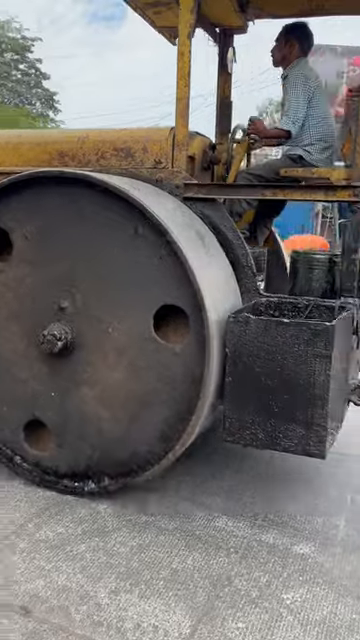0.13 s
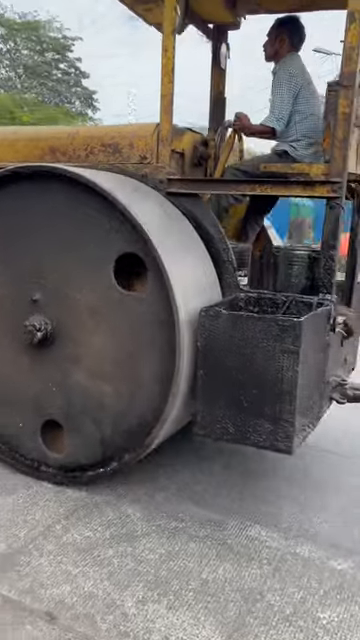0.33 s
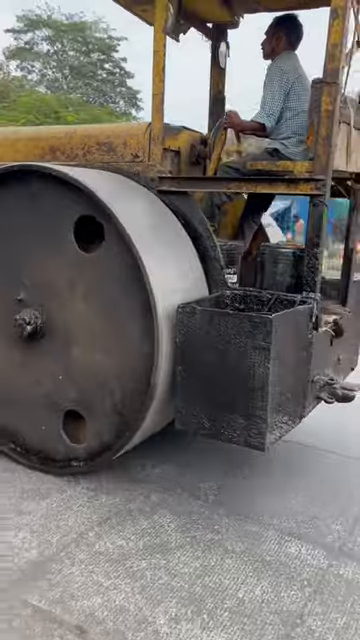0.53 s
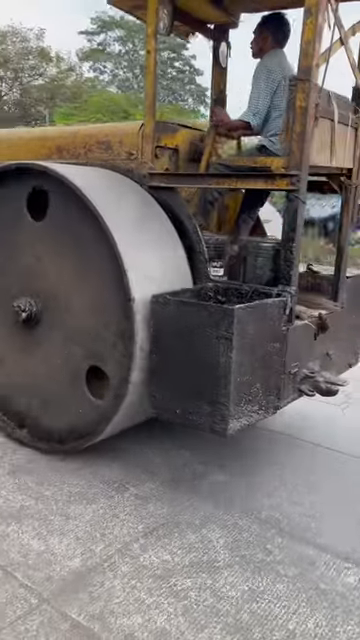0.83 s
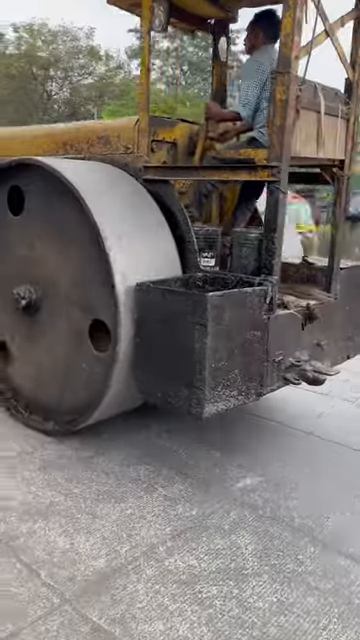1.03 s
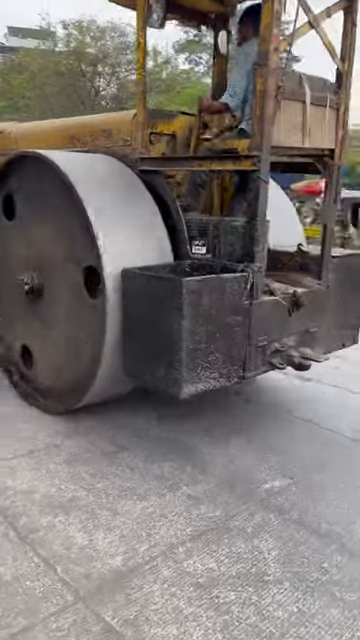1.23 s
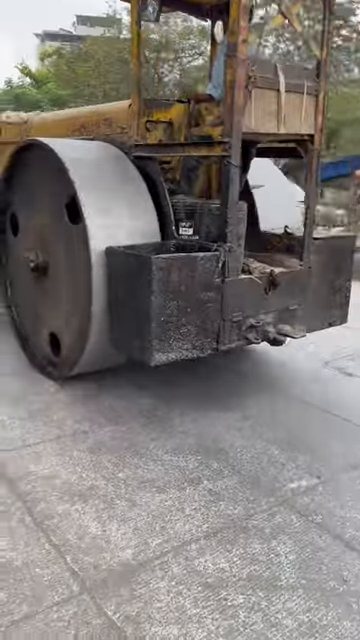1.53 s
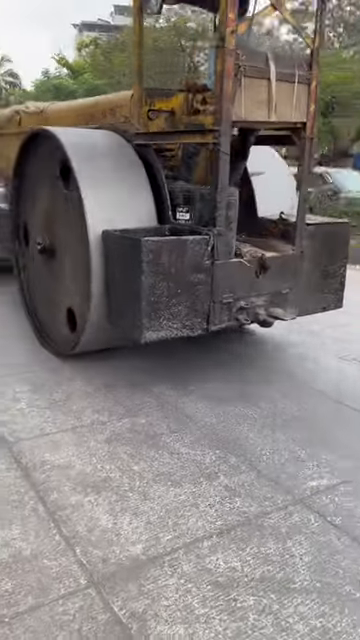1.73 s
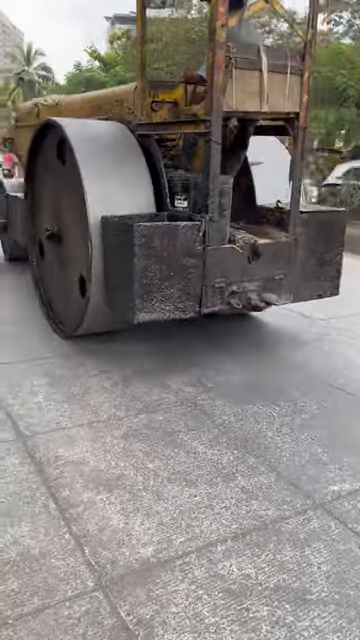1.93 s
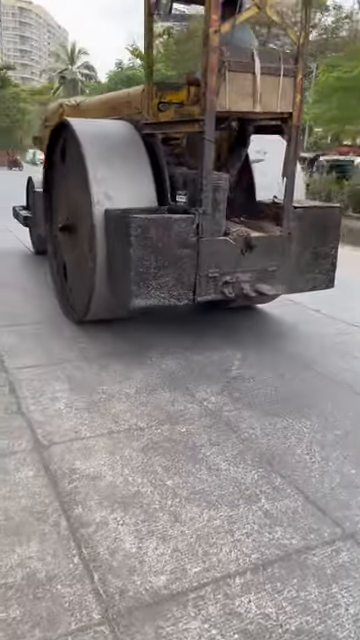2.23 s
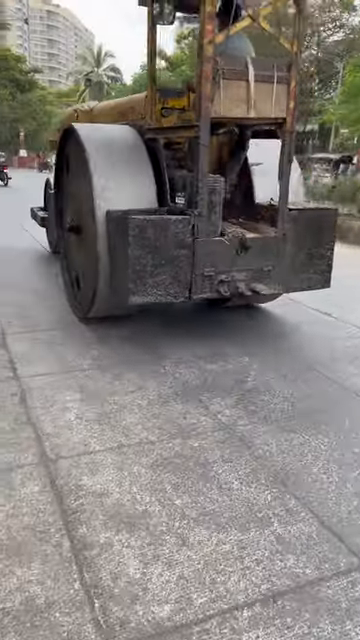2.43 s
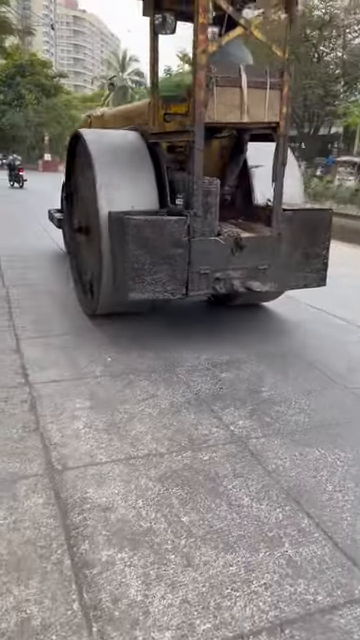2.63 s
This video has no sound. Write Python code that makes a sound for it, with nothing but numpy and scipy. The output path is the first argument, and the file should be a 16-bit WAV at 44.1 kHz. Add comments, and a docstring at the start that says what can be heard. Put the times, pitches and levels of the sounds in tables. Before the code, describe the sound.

A road roller rumbles close by from the start, low drum booms and uneven jolts over rough diesel and traffic roar, rattling panels and crackling grit. Faint dry squeaks at 0.1 and 0.6 s, scrapes at 0.3 and 0.8, then the loudest clank at 0.87 with a short ring. It gradually recedes, with crunches near 1.4 and a small tick at 2.3. A thin, high distant horn wavers from 2.25 to the end.

```python
"""An old road roller rolls away on a paved street: bumps and jolts ring the modes of its steel drums and frame.
Clicks and noise make crushed grit; chopped noise is the diesel among the traffic.
Struck resonators rattle, wavering tones squeak, banded grains scrape, dying tones ping; one clank is the loudest.
A far horn, two high partials, sounds near the end. A phone with two microphone ports hears it all.
"""
import sys
import numpy as np
from scipy import signal
from scipy.fft import rfft, irfft
from scipy.io import wavfile

SR = 44100
rng = np.random.default_rng(int(sys.argv[2]) if len(sys.argv) > 2 else 0)


def output_pcm(signal):
    """Save a mono or channel-first signal as 16-bit PCM at the path in sys.argv[1].

    Samples are clipped to [-1, 1] before scaling.
    """
    pcm = np.clip(np.atleast_2d(signal).T, -1, 1) * 32767
    wavfile.write(sys.argv[1], SR, np.round(pcm).astype(np.int16))


N = 123480


def amp(db):
    """Decibels to linear amplitude."""
    return 10 ** (np.asarray(db) / 20)


def evened(x):
    """Scales to rms 1."""
    return x / np.sqrt(np.mean(x ** 2) + 1e-20)


def along(table, column):
    """Interpolates one column of a time table at every sample."""
    rows = np.array(table)
    return np.interp(np.arange(N) / SR, rows[:, 0], rows[:, column])


def colour(x, points):
    """Filters by a (Hz, dB) spectrum, linear in log frequency, -70 dB outside; rms 1."""
    point_hz, point_db = np.transpose(points)
    hz = np.fft.rfftfreq(N, 1 / SR) + 1
    gain_db = np.interp(np.log(hz), np.log(point_hz), point_db, left=-70, right=-70)
    return evened(irfft(rfft(x) * amp(gain_db), N))


def grains(per_s, spread_db):
    """Clicks of random sign at a mean rate; positive spread makes a few larger, negative a few smaller."""
    size_db = spread_db * np.minimum(rng.exponential(1, N), 5)
    sign = rng.choice([-1., 1.], N)
    return amp(size_db) * sign * (rng.random(N) < per_s / SR)


def wander(seconds):
    """Slow random drift, rms 1: noise smoothed by a Hann window of this length."""
    return evened(signal.oaconvolve(rng.standard_normal(N), np.hanning(int(seconds * SR)), "same"))


FLUTTER_DB = 3.2  # rms, horn and squeaks
HORN_HZ, HORN_WAVER, HORN_SAG_HZ_PER_S = 3424, .003, 55  # 8th partial at onset; rms pitch ratio

# horn at the right port: start_s, partial_8_db, partial_9_db
HORN_LEVELS = [(2.24, -47, -50), (2.32, -34, -52), (2.42, -31, -52), (2.5, -35, -47), (2.6, -37, -45),
               (2.65, -39, -55), (2.72, -37, -50), (2.8, -32, -45)]
# left port against right, a row per partial: level_db, lead_rad
HORN_LEFT = [(-5, 2.4), (-3, 0)]


def horn():
    """Only the 8th and 9th partials carry; pitch sags and wavers, each partial flutters apart at each port."""
    since_s = np.arange(N) / SR - HORN_LEVELS[0][0]
    pitch_hz = (HORN_HZ - HORN_SAG_HZ_PER_S * since_s) * (1 + HORN_WAVER * wander(0.027))
    turns = np.cumsum(pitch_hz) / SR
    left, right = np.zeros((2, N))
    for k, (db, lead_rad) in enumerate(HORN_LEFT):
        level_db = along(HORN_LEVELS, column=k + 1)
        angle = 2 * np.pi * turns * (8 + k) / 8
        left += amp(level_db + db + FLUTTER_DB * wander(0.022)) * np.sin(angle + lead_rad)
        right += amp(level_db + FLUTTER_DB * wander(0.02)) * np.sin(angle)
    return np.array([left, right]) * np.clip(since_s / 0.021, 0, 1)


FIRING_HZ, KNOCK = 47.2, 0.24  # mean rate; chop depth

# roller drawing away, before each layer's trim (also grit, rattle): start_s, roar_db, grit_db
PASS = [(0.04, -28.5, -48), (1.86, -32.5, -46.5), (2.8, -33, -56)]
# engine and traffic spectrum: freq_hz, level_db
ROAR_SPECTRUM = [(300, 1), (600, 4.5), (1000, 0.5), (1900, -4), (2400, -11), (3500, -14), (5000, -18.5),
                 (8000, -24)]


def roar():
    """Diesel and traffic: wide noise lightly chopped by uneven firings, level drifting."""
    turns = np.cumsum(FIRING_HZ * (1 + .1 * wander(0.13))) / SR
    chop = 1 - KNOCK + KNOCK * 2 * np.exp(-(turns % 1) / 0.082)
    level_db = along(PASS, column=1) + 1.8 * wander(0.029)
    return amp(level_db) * colour(chop * rng.standard_normal(N), ROAR_SPECTRUM)


SQUEAK_DB, SQUEAK_WAVER = -46, .004  # waver: rms pitch ratio

# dry bearings: start_s, length_s, pitch_hz
SQUEAKS = [(0.118, 0.15, 4430), (0.127, 0.1, 3370), (0.557, 0.17, 3480), (0.718, 0.08, 3500)]


def squeaks():
    """Dry bearings: faint wavering whines that swell and fade."""
    t, out = np.arange(N) / SR, np.zeros(N)
    for start_s, length_s, pitch_hz in SQUEAKS:
        level = amp(SQUEAK_DB + FLUTTER_DB * wander(.03))
        swell = np.sin(np.pi * np.clip((t - start_s) / length_s, 0, 1)) ** .5
        turns = pitch_hz * np.cumsum(1 + SQUEAK_WAVER * wander(0.056)) / SR
        out += level * swell * np.sin(2 * np.pi * turns)
    return out


SCRAPE_OCTAVES, SCRAPE_RISE_S, SCRAPE_FALL_S = 0.8, 0.0098, 0.011

# rough scrapes: start_s, level_db, length_s, centre_hz
SCRAPES = [(0.289, -33.5, 0.19, 1610), (0.777, -28.5, 0.16, 730), (2.271, -30.5, 0.033, 1400)]


def scrapes():
    """Rough rubbing: coarse grains in a broad band, quick to start."""
    t, out = np.arange(N) / SR, np.zeros(N)
    inner, outer = 2 ** (SCRAPE_OCTAVES / 2), 2 ** (2 * SCRAPE_OCTAVES)
    for start_s, level_db, length_s, hz in SCRAPES:
        band = [(hz / outer, -30), (hz / inner, 0), (hz * inner, -2), (hz * outer, -30)]
        rise = np.clip((t - start_s) / SCRAPE_RISE_S, 0, 1)
        fall = np.exp(-np.maximum(t - start_s - length_s, 0) / SCRAPE_FALL_S)
        out += amp(level_db) * rise * fall * colour(grains(2500, 1.1), band)
    return out


# metal rings, one a loud clank: start_s, level_db, pitch_hz, decay_s (to 1/e)
PINGS = [(.785, -20, 694, 0.022), (0.8654, 2, 351, 0.011), (.915, -17.5, 374, 0.12),
         (2.272, -25, 1340, 0.0041)]


def pings():
    """Struck metal: exponentially dying tones with a rise of half a cycle."""
    t, out = np.arange(N) / SR, np.zeros(N)
    for start_s, level_db, pitch_hz, decay_s in PINGS:
        since_s = t - start_s
        rise = np.clip(since_s * pitch_hz * 2, 0, 1)
        fall = np.exp(-np.maximum(since_s, 0) / decay_s)
        out += amp(level_db) * rise * fall * np.sin(-2 * np.pi * pitch_hz * since_s)
    return out


RATTLE_LOW_HZ, RATTLE_HIGH_HZ, RATTLE_T60_S = 800, 4600, .1
RATTLES_PER_S, RATTLE_DB, RATTLE_TILT_DB_PER_OCTAVE = 12, -8, -4  # rate per part; level re roar


def rattle():
    """Loose panels and bolts: randomly struck, each rings briefly at its own pitch, high ones softer."""
    t, out = np.arange(SR // 8) / SR, np.zeros(N)
    spaced_hz = np.geomspace(RATTLE_LOW_HZ, RATTLE_HIGH_HZ, num=40)
    for hz in spaced_hz * rng.uniform(.98, 1.02, size=40):
        tilt_db = RATTLE_TILT_DB_PER_OCTAVE * np.log2(hz / RATTLE_LOW_HZ)
        ring = amp(tilt_db - 60 * t / RATTLE_T60_S) * np.sin(2 * np.pi * hz * t)
        rise = np.minimum(t / .004, 1)
        out += signal.oaconvolve(grains(RATTLES_PER_S, 2.5), ring * rise)[:N]
    return amp(along(PASS, column=1) + RATTLE_DB) * evened(out)


CRUNCH_RISE_S, CRUNCH_FALL_S = 0.0064, 0.024
GRAINS_PER_S, GRAIN_SPREAD_DB, GRIT_DB, FIZZ_DB = 7100, -2, 10.5, -14.5  # fizz re snaps

# grit spectrum: freq_hz, level_db
GRIT_SPECTRUM = [(1000, 7), (2500, 5), (4000, 0.5), (6000, 3), (9000, -9), (12500, -10), (15700, -48)]
# finest snaps: freq_hz, level_db
FIZZ_SPECTRUM = [(8000, 0), (10500, -6), (13000, -5), (15700, -8)]
# patches of loose grit crushed: start_s, over_hiss_db, length_s
CRUNCHES = [(0.037, 8, 0.014), (0.097, 7, 0.025), (0.166, 5.5, 0.071), (0.297, 7.5, 0.032),
            (0.564, 4.5, 0.056), (0.717, 3.5, 0.021), (0.77, 6.5, 0.023), (0.908, 5.5, 0.013),
            (1.405, 8, 0.068), (1.585, 5, 0.055), (1.694, 6.5, 0.019), (1.748, 3.5, 0.03),
            (1.846, 4.5, 0.049), (2.154, 4, 0.018), (2.215, 4, 0.04), (2.269, 4, 0.11), (2.742, 9, .05)]


def grit():
    """Crushed grit: dense snaps over noise plus finer fizz, swelling in patches."""
    t, swell = np.arange(N) / SR, np.ones(N)
    for start_s, over_db, length_s in CRUNCHES:
        rise = np.clip((t - start_s) / CRUNCH_RISE_S, 0, 1)
        fall = np.exp(-np.maximum(t - start_s - length_s, 0) / CRUNCH_FALL_S)
        swell += (amp(over_db) - 1) * rise * fall
    snaps = colour(grains(GRAINS_PER_S, GRAIN_SPREAD_DB) + 2.0 * rng.standard_normal(N), GRIT_SPECTRUM)
    fizz = amp(FIZZ_DB + 2.5 * wander(.03)) * colour(grains(3000, 1.5), FIZZ_SPECTRUM)
    level_db = along(PASS, column=2) + GRIT_DB + 1.3 * wander(.025)
    return amp(level_db) * swell * (snaps + fizz)


BUMPS_PER_S, BUMP_SPREAD_DB, GROUND_DB = 260, 3, -1.5  # ground re frame rumble
SHELL_HZ = 220  # modes above: drum shells; below: frame
JOLT_RISE_S, JOLT_OCTAVES = 0.0021, 0.17  # octaves off pitch where strike falls to 1/e

# steel modes of drums and frame: pitch_hz, level_db, t60_s
MODES = [(57.2, -1, 0.34), (81.5, -0.5, 0.17), (111, 4.5, 0.17), (140.2, 1.5, 0.31), (197.6, -1.5, 0.1),
         (260, -4.5, 0.089), (319.7, -2, 0.22), (375.2, -9.5, 0.22), (446.4, -7.5, 0.16),
         (532.4, -4.5, 0.051)]
# uneven boom over the slabs: start_s, frame_rumble_db, shell_ring_db
BOOM = [(.07, -18, -26.5), (.22, -21.5, -30), (.5, -19.5, -24), (.74, -22, -24), (.95, -21.5, -21),
        (1.2, -24.5, -25.5), (1.47, -22.5, -21), (1.88, -22.5, -27.5), (2.18, -24.5, -28),
        (2.8, -24.5, -31)]
# ground rumble spectrum: freq_hz, level_db
GROUND_SPECTRUM = [(40, -54), (60, -6.5), (150, 0), (400, -7), (700, -21)]
# jolts over paving joints: start_s, peak_db, pitch_hz (modes struck most)
JOLTS = [(0.299, -10, 108), (0.429, -6.5, 118.5), (0.489, -14, 361), (0.512, -6.5, 132), (0.629, -8, 106),
         (0.811, -10, 102), (.879, -14, 310), (0.882, -8, 125.6), (1.05, -20, 320), (1.384, -12, 75),
         (1.468, -13.5, 150), (1.53, -13, 260), (1.747, -15, 100), (1.87, -12.5, 132), (2.358, -15, 117),
         (2.659, -14.5, 105.4)]


def drums():
    """Many small bumps and a few jolts ring damped steel modes; noise rumbles as the ground beneath."""
    t = np.arange(SR // 2) / SR
    mode_hz = np.array(MODES)[:, 0]
    modes = np.array([amp(db - 60 * t / t60_s) * np.sin(2 * np.pi * hz * t) for hz, db, t60_s in MODES])
    bumps = np.array([signal.oaconvolve(grains(BUMPS_PER_S, BUMP_SPREAD_DB), mode)[:N] for mode in modes])
    is_shell = mode_hz > SHELL_HZ
    shell = evened(bumps[is_shell].sum(0))
    frame = evened(bumps[~is_shell].sum(0))
    ground = amp(GROUND_DB) * colour(rng.standard_normal(N), GROUND_SPECTRUM)
    out = amp(along(BOOM, column=2)) * shell + amp(along(BOOM, column=1)) * (frame + ground)
    for start_s, peak_db, pitch_hz in JOLTS:
        strike = np.exp(-(np.log2(mode_hz / pitch_hz) / JOLT_OCTAVES) ** 2)
        ring = strike @ modes * (1 - np.exp(-t / JOLT_RISE_S))
        part = out[round(start_s * SR):][:len(t)]  # a view: adds into out
        part += (amp(peak_db) * ring / abs(ring).max())[:len(part)]
    return out


# microphone ports: freq_hz, left_lead_rad, scattered_share_db, left_minus_right_db
PORTS = [(0, 0, -40, 0), (300, -.35, -22, .3), (500, -.75, -13, 0), (750, -1.5, -4, -5), (950, 0, -8, -4),
         (1300, -.55, -9, -3), (1900, .3, -8, -2), (2300, 2.2, -2.4, -1), (3100, 2.8, -1.2, -3),
         (3800, 1, -.4, -2), (4300, 2.6, -1, -.5), (5000, 2, -.4, -.5), (5700, 2.9, -18, 0),
         (6050, 3.14, -25, 0), (10200, 9.42, -25, 0), (14900, 15.7, -25, 0)]


def ports(direct, scattered):
    """Left port leads in phase and trades a share of direct sound for scattered; levels tilt by frequency."""
    port_hz, *columns = np.transpose(PORTS)
    hz = np.fft.rfftfreq(N, 1 / SR)
    lead_rad, share_db, tilt_db = (np.interp(hz, port_hz, column) for column in columns)
    share = amp(np.minimum(share_db, 0))
    right = rfft(direct)
    left = np.sqrt(1 - share ** 2) * np.exp(1j * lead_rad) * right + share * rfft(scattered)
    return irfft(np.array([left * amp(tilt_db / 2), right * amp(-tilt_db / 2)]), N)


def scene():
    """Street scatter is a second random draw of the machine, sharing jolts, pings and squeaks; horn on top."""
    rings = pings() + squeaks()
    direct, scattered = (drums() + roar() + rattle() + scrapes() + grit() + rings for _ in range(2))
    return ports(direct, scattered) + horn()


START_S, LOW_CUT_HZ, EDGE_HZ = .0355, 44.4, 15700


def record(dry):
    """Bass cut, abrupt start, soft overload, treble limit."""
    bass_cut = signal.butter(4, LOW_CUT_HZ, "high", fs=SR, output="sos")
    heard = signal.sosfilt(bass_cut, dry) * (np.arange(N) / SR > START_S)
    heard = np.tanh(heard / 1.6) * 1.6
    treble_limit = signal.firwin(511, EDGE_HZ, window=("kaiser", 9), fs=SR)
    return signal.oaconvolve(heard, treble_limit[None], "same")


dry = scene()
out = record(dry)
output_pcm(out)
```